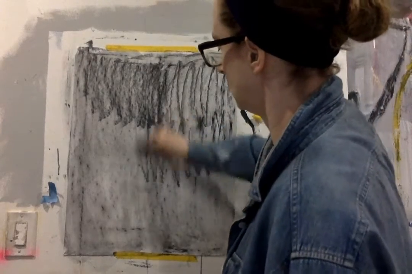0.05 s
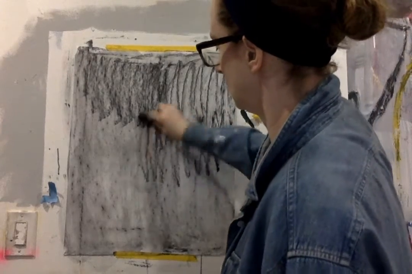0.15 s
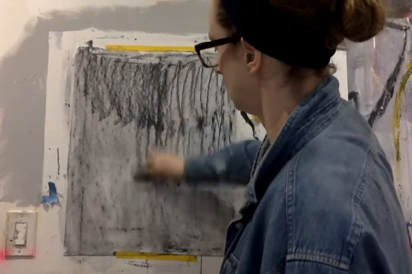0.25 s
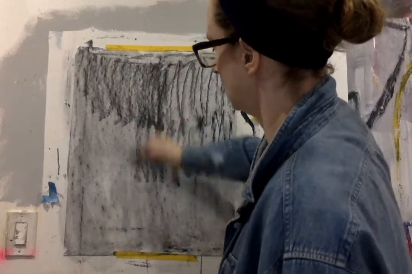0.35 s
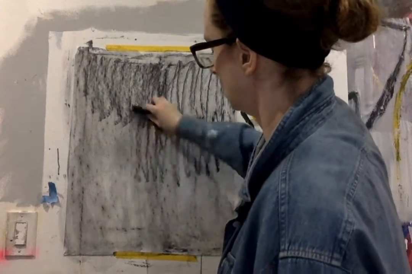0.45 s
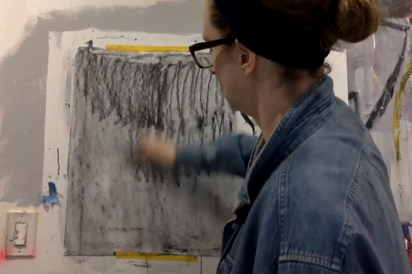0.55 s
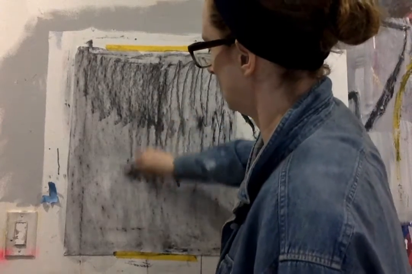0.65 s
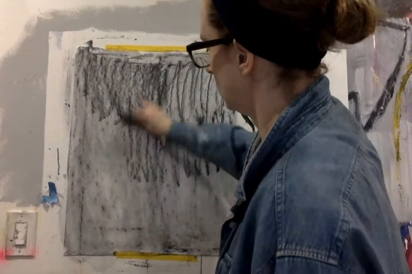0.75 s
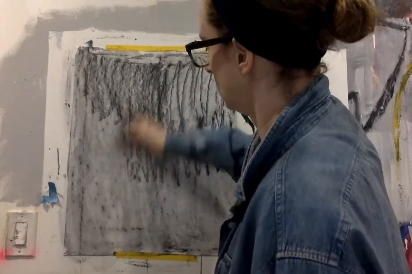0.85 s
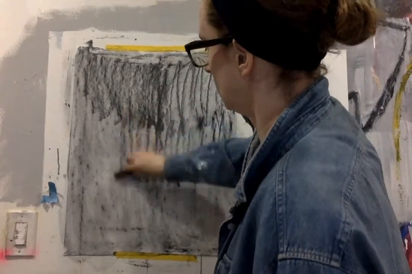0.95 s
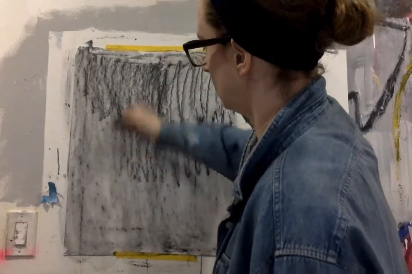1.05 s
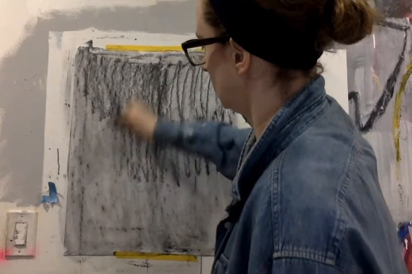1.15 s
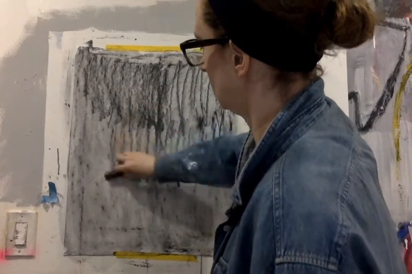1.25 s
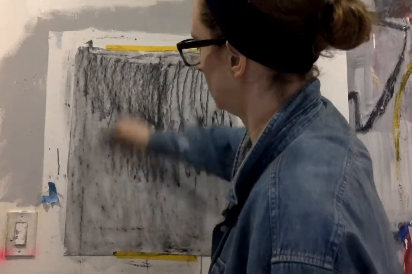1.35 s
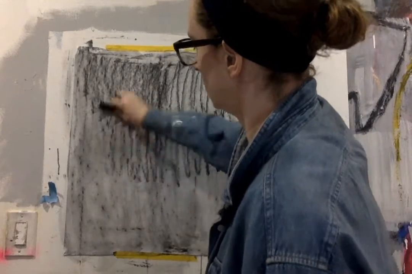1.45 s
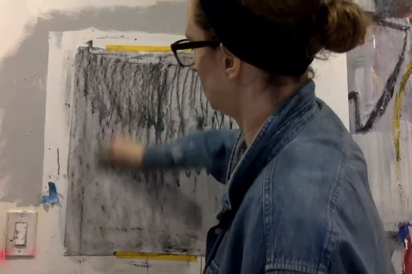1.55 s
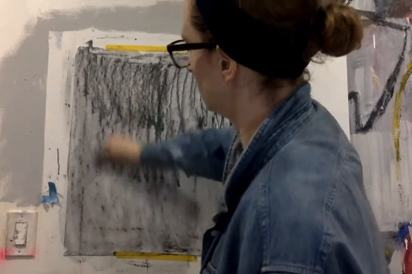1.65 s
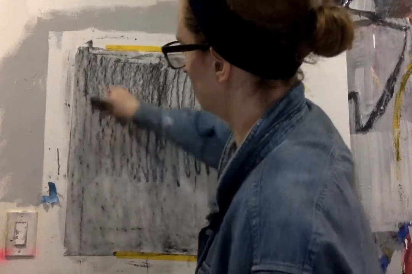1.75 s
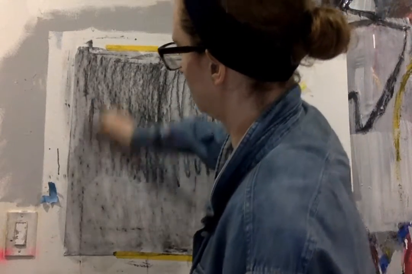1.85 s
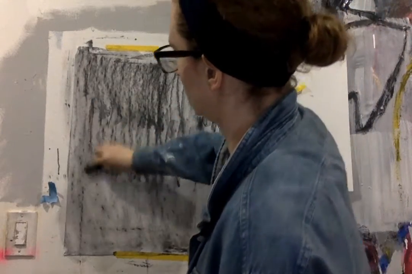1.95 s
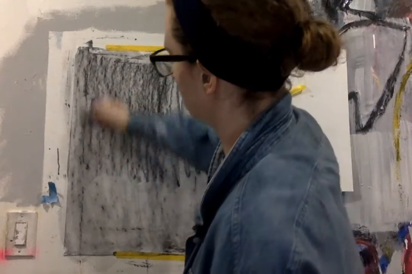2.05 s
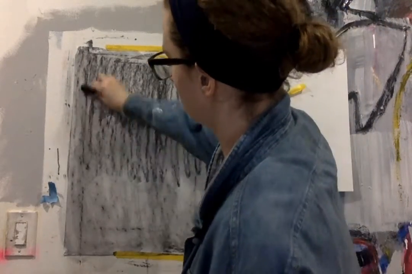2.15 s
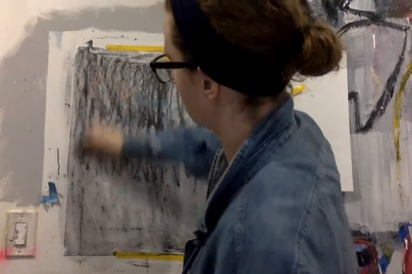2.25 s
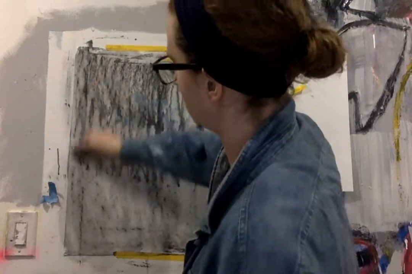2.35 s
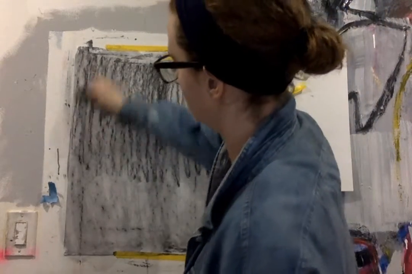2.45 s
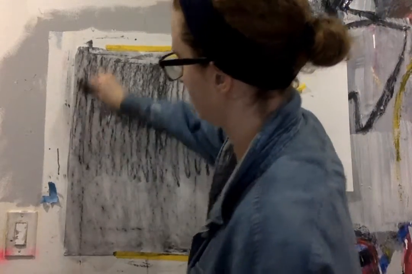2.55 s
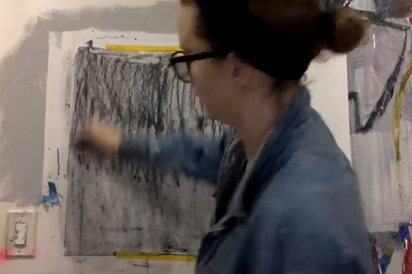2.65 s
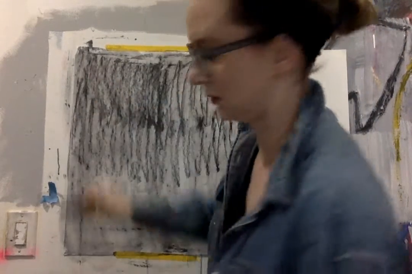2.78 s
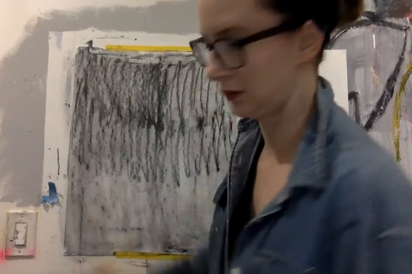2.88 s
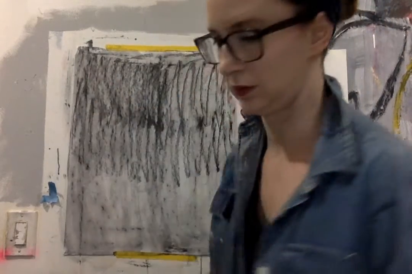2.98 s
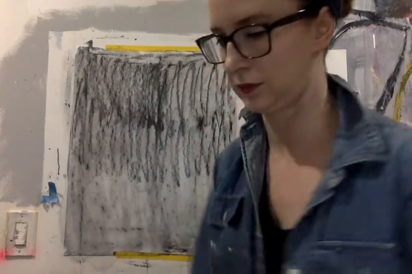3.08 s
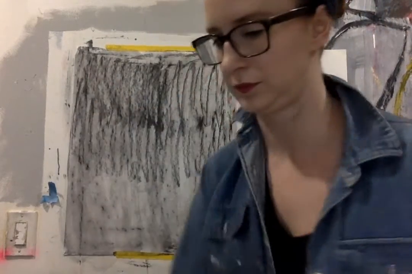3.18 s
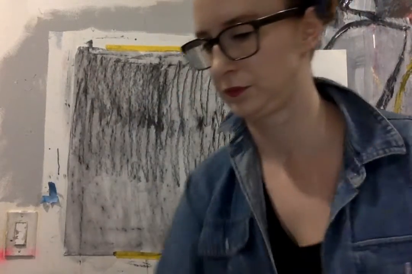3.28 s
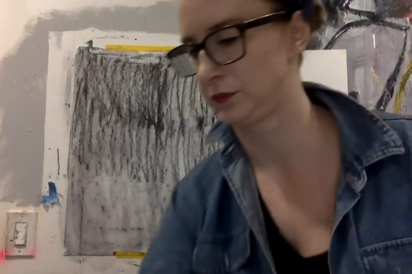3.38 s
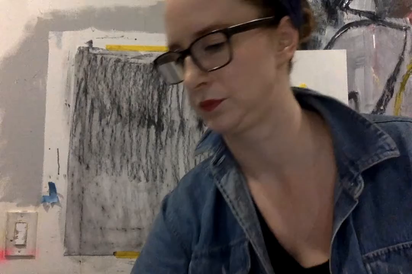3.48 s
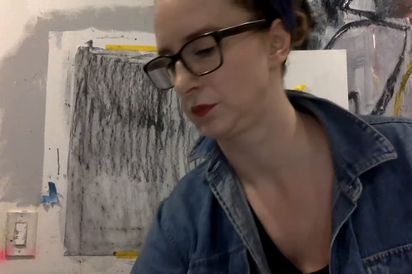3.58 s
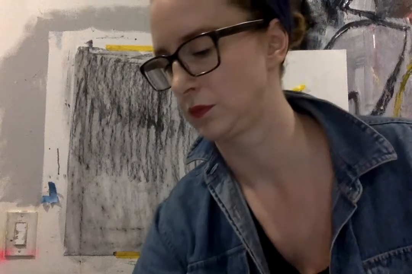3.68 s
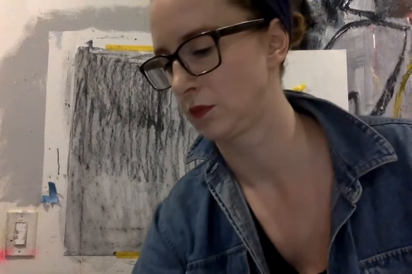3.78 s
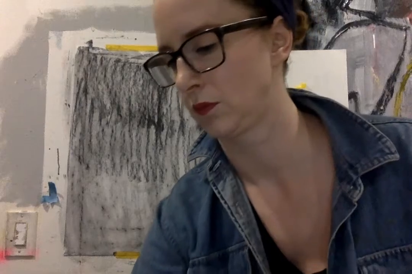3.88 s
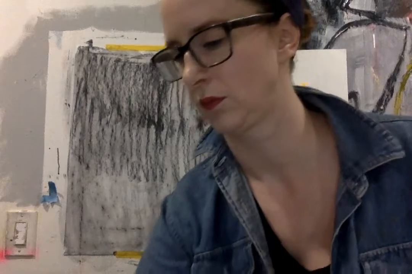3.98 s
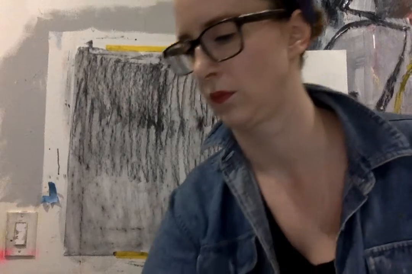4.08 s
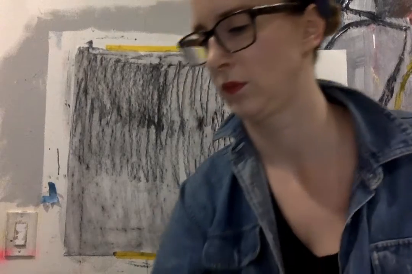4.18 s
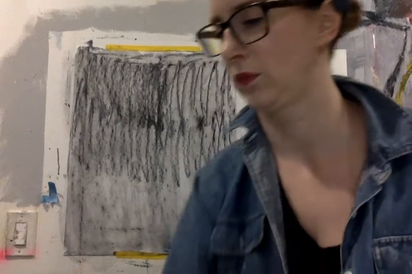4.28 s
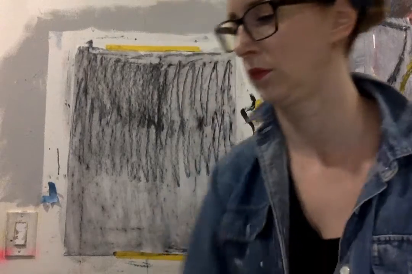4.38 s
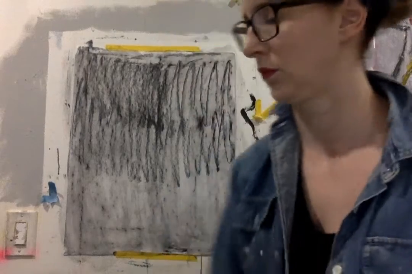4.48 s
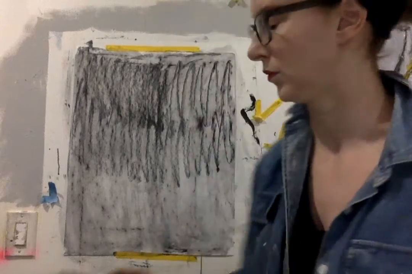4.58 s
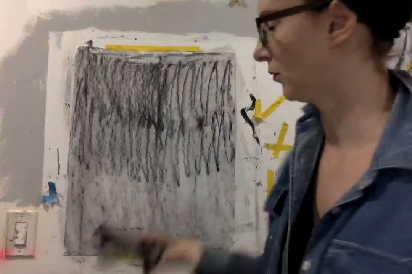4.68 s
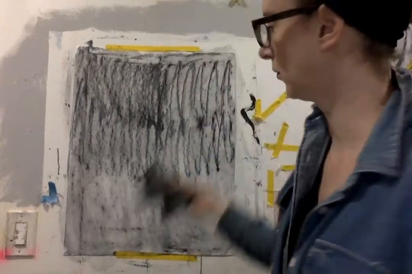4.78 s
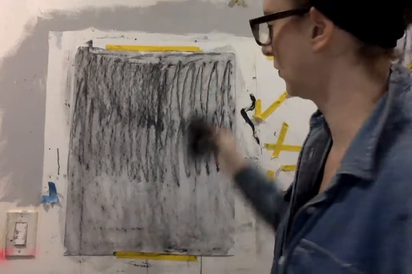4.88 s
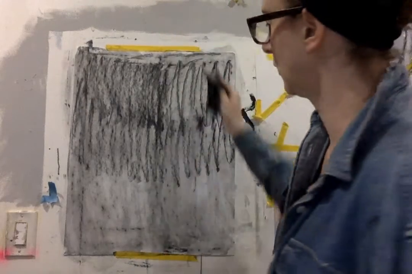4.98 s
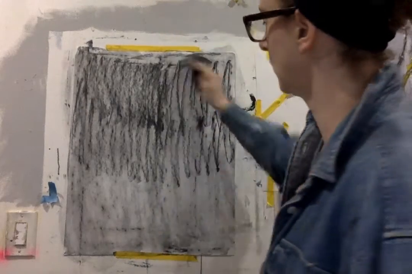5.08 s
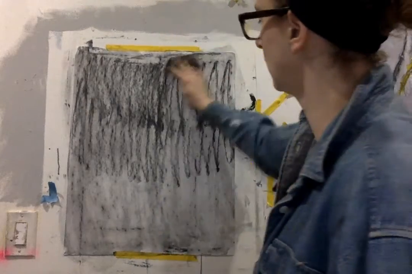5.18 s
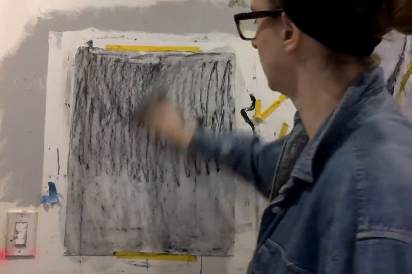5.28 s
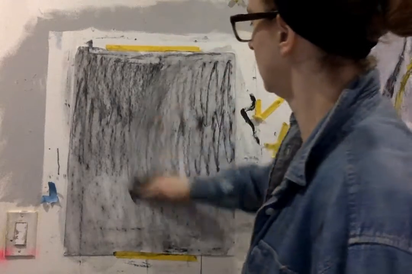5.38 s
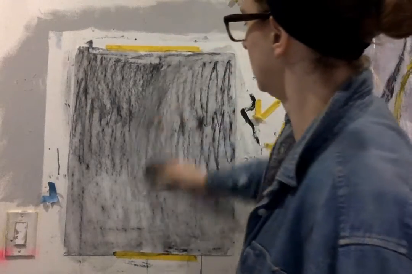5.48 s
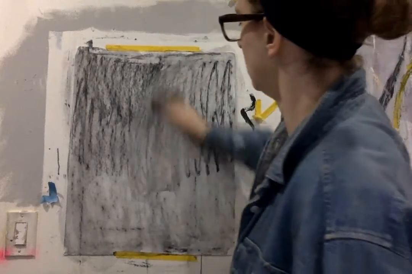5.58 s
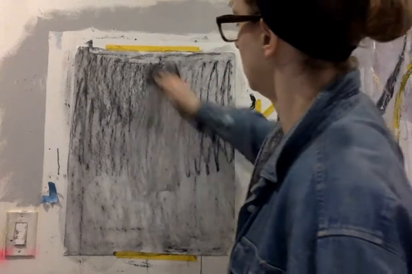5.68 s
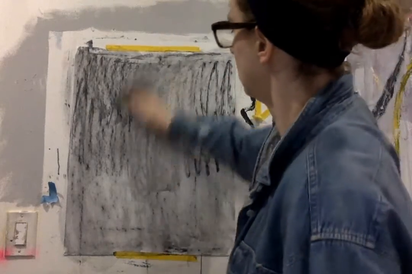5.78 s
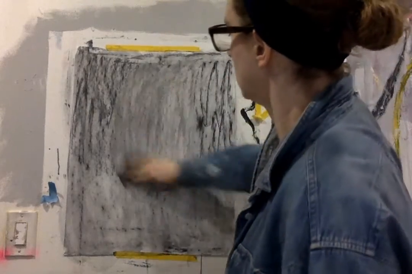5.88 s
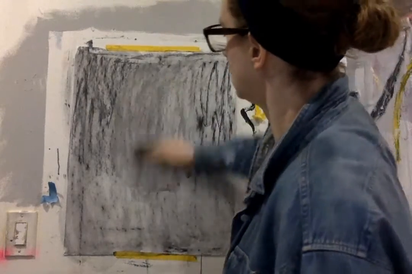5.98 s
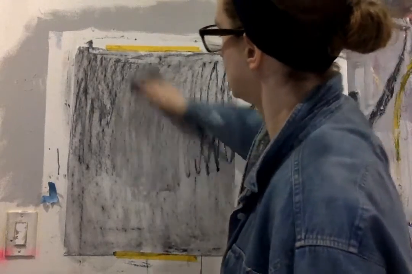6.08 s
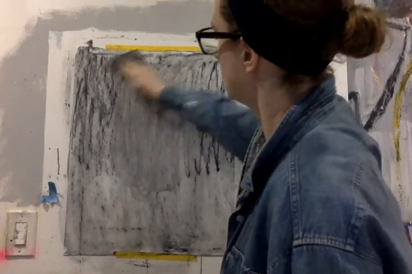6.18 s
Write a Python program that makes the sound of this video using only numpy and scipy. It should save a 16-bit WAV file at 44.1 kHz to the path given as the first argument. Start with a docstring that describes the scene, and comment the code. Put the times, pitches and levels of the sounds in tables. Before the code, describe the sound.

A small, bass-light microphone close by catches rapid charcoal rubbing, bright and grainy, the wall behind the paper thudding lightly at hard turns. After nearly three seconds the drawing ends, leaving faint room tone and chirping sparrows. A dropped stick rattles in a wooden tray after a light glass clink, followed by a very high tinkle. Finally a cloth slaps gently onto the paper and rubs in longer, softer swishes.

```python
"""Close in a studio, a charcoal stick scribbles on paper taped to a wall, which drums under the hard strokes:
crumbling grains give the hiss, damped modes the drumming. Then a jar clinks, the dropped stick bounces and
clatters in a wooden tray, and a sliver tinkles, all struck modes. Last, a rag pats the sheet, squeaking briefly
as it lands, and rubs it in long wipes of soft, fine grains. Throughout, sparrows chirp outside; birds and
squeak are trilled gliding whistles, over a faint room rumble of coloured noise; a small microphone loses the
deep bass."""
import sys
import numpy as np
from scipy import signal
from scipy.fft import rfft, irfft
from scipy.io import wavfile

SR = 44100
rng = np.random.default_rng(int(sys.argv[2]) if len(sys.argv) > 2 else 0)


def dump_mix(stems):
    """Bounce the given channels to the path in sys.argv[1] as a 16-bit WAV at rate SR."""
    frames = np.atleast_2d(stems).T  # one column per channel
    limited = np.clip(frames, -1, 1)  # hard clip at full scale
    pcm = np.round(limited * 32767).astype(np.int16)
    wavfile.write(sys.argv[1], SR, pcm)


N = 275184
TIME = np.arange(N) / SR
BIN_HZ = np.maximum(np.arange(N // 2 + 1) * SR / N, 1)
CUTOFF_HZ = 15750
# Levels in the tables are settings ahead of any trim, filter, room or microphone.
# Levels of modes and colours are relative to one another.


def from_db(db):
    """Decibels to gain."""
    return 10 ** (np.asarray(db) / 20)


def rms_one(x):
    """Scale to unit rms."""
    return x / np.sqrt(np.mean(x ** 2) + 1e-20)


def drift(rate):
    """Smooth chance with about `rate` turns a second and unit rms."""
    knots = rng.standard_normal(4096)
    return rms_one(np.interp(TIME * rate, np.arange(len(knots)), knots))


def colour(x, spectrum):
    """Weight x by a spectrum that falls 20 dB per octave beyond its ends; unit rms."""
    hz, db = np.transpose(spectrum)
    octave = np.log2(BIN_HZ)
    beyond = np.abs(octave - np.clip(octave, np.log2(hz[0]), np.log2(hz[-1])))
    gain = from_db(np.interp(octave, np.log2(hz), db) - 20 * beyond)
    return rms_one(irfft(rfft(x) * gain, N))


def bandpass(x, low_hz, high_hz):
    """Keep the band between two frequencies."""
    return signal.sosfilt(signal.butter(2, [low_hz, high_hz], "band", fs=SR, output="sos"), x)


def highpass(x, hz):
    """Remove the bass below hz."""
    return signal.sosfilt(signal.butter(2, hz, "high", fs=SR, output="sos"), x)


def ring(clicks, modes):
    """Clicks set damped sines ringing, with alternating signs."""
    out = np.zeros(N)
    for k, (hz, db, t60) in enumerate(modes):
        decay = from_db(-60 / (t60 * SR))   # per sample
        turn = 2 * np.pi * hz / SR
        poles = [1, -2 * decay * np.cos(turn), decay * decay]
        sine = signal.lfilter([0, np.sin(turn)], poles, clicks + 1e-18)
        out += (-1) ** k * from_db(db) * sine
    return out


def strike(hits, modes, scatter_db):
    """Blows on one body: each lands on a new spot and weights the modes anew."""
    s, db = np.transpose(hits)
    scatter = scatter_db * rng.uniform(-2, 1, (len(s), len(modes)))
    strengths = from_db(db[:, None] + scatter)
    sound = np.zeros(N)
    for k, mode in enumerate(modes):
        clicks = np.zeros(N)
        clicks[np.round(s * SR).astype(int)] = (-1) ** k * strengths[:, k]
        sound += ring(clicks, [mode])
    # the highest peak takes the level of the strongest blow
    return sound * from_db(db.max()) / np.abs(sound).max()


def grains(per_s, spread_db, judder_db, judder_rate):
    """Tiny fractures of uneven size, bunched by stick and slip."""
    born = rng.random(N) < per_s / SR
    sizes = rng.standard_normal(N) * from_db(spread_db * np.minimum(rng.exponential(1, N), 4))
    return rms_one(born * sizes * from_db(judder_db * drift(judder_rate)))


def chips(t60, spread_db, count):
    """Flakes snap off at random; each rings very briefly at a pitch of its own."""
    when, pitch, size = rng.random((count, 3)).T
    t = TIME[:1024]
    hz = 2000 + pitch[:, None] * (CUTOFF_HZ - 2000)
    height = from_db(spread_db * np.minimum(-np.log(1 - size), 3))
    pings = height[:, None] * np.sin(2 * np.pi * hz * t) * from_db(-60 * t / t60)
    at = (when * (N - len(t))).astype(int)[:, None] + np.arange(len(t))
    return rms_one(np.bincount(at.ravel(), pings.ravel(), N))


def shifting(x, depth_db, rate, count):
    """Overlapping bands of the spectrum come and go, each with its own drift."""
    whole = rfft(x)
    place = np.minimum(BIN_HZ / CUTOFF_HZ, 1) * (count - 1)
    out = np.zeros(N)
    for k in range(count):
        band = irfft(whole * np.maximum(1 - np.abs(place - k), 0), N)
        out += band * from_db(depth_db * drift(rate))
    return out


# a rub is SWELL_DB down at the ends of its rise and fall; roundness 1 is a straight slope in dB, 2 a bell
SWELL_DB, RISE_ROUNDNESS, FALL_ROUNDNESS = 34.5, 1.93, 0.98


def swells(rubs, rise_roundness=RISE_ROUNDNESS, fall_roundness=FALL_ROUNDNESS):
    """Friction grows and fades with the hand's speed; rubs add in power, one gain curve per level column."""
    power = np.zeros((len(rubs[0]) - 3, N))
    for s, rise, fall, *levels_db in rubs:
        at = slice(*np.searchsorted(TIME, [s - 2 * rise, s + 4 * fall]))
        t = TIME[at] - s
        before, after = np.abs(t / rise) ** rise_roundness, np.abs(t / fall) ** fall_roundness
        away = np.where(t < 0, before, after)
        power[:, at] += np.outer(from_db(levels_db), from_db(-SWELL_DB * away)) ** 2
    return np.sqrt(power)


def glide(s, length, start_hz, end_hz, db, bend_hz, attack, release):
    """A tone that slides between two pitches, bent on its way by bend_hz."""
    at = slice(*np.searchsorted(TIME, [s, s + length]))
    t, out = TIME[at] - s, np.zeros(N)
    hz = start_hz + (end_hz - start_hz) * t / length + bend_hz[at]
    loudness = np.clip(np.minimum(t / attack, (length - t) / release), 0, 1)
    tone = np.sin(2 * np.pi * np.cumsum(hz) / SR)
    out[at] = from_db(db) * rms_one(loudness * tone)
    return out


def studio(x, wet_db, t60):
    """Direct sound plus a diffuse tail from the first reflections on; power is roughly kept."""
    t = TIME[:SR // 2]
    tail = rng.standard_normal(len(t)) * from_db(-60 * t / t60) * (t > .004)
    echoes = signal.fftconvolve(x, tail / np.linalg.norm(tail))[:N]
    wet = from_db(wet_db)
    return (x + wet * echoes) / np.hypot(1, wet)


# rumble of the empty room: (frequency [Hz], density [dB per Hz])
RUMBLE_COLOUR = [(18, -44), (30, -1), (71, -5.5), (105, -7.5), (130, 3), (243, -1), (379, -4.5), (479, -11),
                 (709, -14.5), (808, -10.5), (996, -4.5), (1590, -16), (3980, -17.5), (8500, -34),
                 (15500, -25)]


def room_rumble():
    """Steady noise of the room, coloured by its spectrum, at -66 dB rms."""
    return from_db(-66) * colour(rng.standard_normal(N), RUMBLE_COLOUR)


# sparrows outside, and one short gritty squeak near 2.4 kHz at 5.201 s as the rag lands; a cheep is often a
# high note running into a lower buzz: # (time [s], length [s], start [Hz], end [Hz], full trill depth [Hz],
# level [dB])
GLIDING_NOTES = [(0.035, 0.047, 3310, 3215, 150, -49), (0.495, 0.027, 4960, 4900, 350, -46.5),
                 (0.523, 0.075, 3920, 3610, 454, -48), (0.632, 0.07, 4070, 3100, 250, -57.5),
                 (1.164, 0.034, 4450, 4020, 300, -48.5), (1.188, 0.089, 3735, 3315, 390, -42.5),
                 (1.831, 0.058, 4300, 4380, 347, -44), (1.906, 0.054, 3460, 2807, 503, -46),
                 (2.552, 0.097, 3720, 3666, 470, -46), (2.813, 0.014, 2260, 2325, 55.8, -57.5),
                 (2.866, 0.046, 4660, 4460, 395.5, -44.5), (2.889, 0.062, 3850, 3310, 517, -54),
                 (3.033, 0.074, 4150, 3540, 260, -62.5), (3.15, 0.058, 4556, 4150, 430, -46),
                 (3.2, 0.093, 2967, 3135, 295, -57.5), (3.286, 0.03, 4040, 4340, 250, -59),
                 (3.346, 0.043, 3760, 3820, 221, -55.5), (3.723, 0.042, 4050, 4620, 546, -49),
                 (3.756, .092, 3990, 3170, 595, -42), (3.903, 0.028, 4200, 4080, 300, -47.5),
                 (3.946, 0.087, 3860, 3350, 553, -48.5), (4.376, 0.036, 4920, 4670, 644, -52.5),
                 (4.401, 0.094, 3980, 3790, 630, -45.5), (4.663, 0.041, 3970, 3890, 219, -55),
                 (4.745, 0.048, 4850, 4400, 475, -51.5), (4.766, 0.091, 3835, 3463, 750, -45.5),
                 (4.985, .086, 4560, 4370, 460, -45.5), (4.985, 0.074, 3750, 3250, 700, -50.5),
                 (5.062, 0.071, 3260, 3240, 550, -50), (5.201, 0.014, 2460, 2380, 60, -49),
                 (5.276, 0.055, 4690, 3710, 480, -48), (5.45, 0.059, 3810, 3820, 258, -49.5),
                 (5.538, 0.071, 4300, 4010, 318, -50), (5.628, 0.034, 4920, 4650, 405, -51),
                 (5.656, 0.091, 3810, 3564, 500, -46.5), (6.074, 0.048, 3760, 3720, 160, -55),
                 (6.175, 0.063, 3970, 3970, 200, -57)]
TRILL_HZ, WAVER_HZ, FLUTTER_DB = 135, 60, 3   # typical trill rate; rms pitch waver; rms level flutter


def sparrows_and_squeak():
    """Each note is a gliding whistle swept by a fast, uneven trill, smeared by echoes on its way in; the rag's
    short squeak is played the same way."""
    trill_rate = TRILL_HZ * np.exp(.25 * drift(140))
    trill = np.sin(2 * np.pi * np.cumsum(trill_rate) / SR)
    trill *= np.clip(.72 + .25 * drift(110), 0, 1)   # the trill tightens and loosens
    waver = WAVER_HZ * drift(120)
    song = np.zeros(N)
    for s, length, start_hz, end_hz, depth_hz, db in GLIDING_NOTES:
        bend_hz = depth_hz * trill + waver
        song += glide(s, length, start_hz, end_hz, db, bend_hz, attack=.014, release=.012)
    fluttering = song * from_db(FLUTTER_DB * drift(140))
    return from_db(-3.5) * studio(fluttering, wet_db=-0.5, t60=0.23)


# a jar among the tools is nudged: (time [s], peak level [dB])
JAR_CLINKS = [(3.619, -33), (3.640, -47)]
# glassy ring of the jar: (frequency [Hz], level [dB], t60 [s])
JAR_MODES = [(3126, -15.5, 0.043), (3205, -13.5, 0.077), (3880, -24, 0.038), (3990, -22, 0.033)]


def jar():
    """Two light knocks set the jar's high modes ringing."""
    return bandpass(strike(JAR_CLINKS, JAR_MODES, scatter_db=1), 2200, 5000)


# the dropped stick bounces in a wooden tray: (time [s], knock peak level [dB], thud peak level [dB])
STICK_BOUNCES = [(3.6866, -20, -43), (3.7187, -30.5, -40), (3.7233, -50, -30), (3.7620, -23.5, -58),
                 (3.7745, -32, -61), (3.793, -41, -49), (3.7992, -27, -62), (3.8174, -27, -57),
                 (3.8327, -52, -75), (3.8445, -39, -53)]
# between bounces it rolls and chatters: (time of peak [s], rise [s], fall [s], level [dB])
STICK_ROLLS = [(3.735, 0.057, .06, -46), (3.815, 0.058, 0.11, -53.5)]
# wood of the tray, and its deeper thud: (frequency [Hz], level [dB], t60 [s])
TRAY_MODES = [(470, -13, .03), (630, -6, .026), (765, -1.5, .028), (900, -3, .02), (1005, -2, .025),
              (1100, -14, .02), (1620, -14, .02), (1950, -15, .008), (2330, -7, .009), (2720, -10, .008)]
THUD_MODES = [(121, 2, 0.047), (181, -4, 0.083), (257, -7, 0.16), (331, -4, 0.091)]
WALL_ECHO_S, WALL_ECHO_DB = .0162, -9


def tray():
    """Bounces and a rolling chatter ring the wood; the near wall sends the sound back once."""
    knocks = strike([(s, db) for s, db, _ in STICK_BOUNCES], TRAY_MODES, scatter_db=1.5)
    thuds = strike([(s, db) for s, _, db in STICK_BOUNCES], THUD_MODES, scatter_db=1)
    chatter = grains(per_s=400, spread_db=1, judder_db=1, judder_rate=150)
    rolling = swells(STICK_ROLLS)[0] * rms_one(ring(chatter, TRAY_MODES))
    # soft contact dulls the knocks, and the small tray cannot radiate deep bass
    direct = bandpass(knocks + thuds + rolling, 90, 3800)
    return direct + from_db(WALL_ECHO_DB) * np.interp(TIME - WALL_ECHO_S, TIME, direct)


# charcoal dust skitters in the tray, then settles: (time of peak [s], rise [s], fall [s], level [dB])
DUST_SKITTERS = [(3.732, 0.034, 0.017, -56), (3.8, 0.17, 0.15, -62.5)]
# hiss of the dust: (frequency [Hz], density [dB per Hz])
DUST_HISS = [(5200, 21), (6800, -24), (8500, 2), (10500, -4), (12700, 5), (15500, -7)]


def dust():
    """Many tiny grains make a short, bright hiss."""
    specks = grains(per_s=2100, spread_db=3.0, judder_db=0.5, judder_rate=110)
    return swells(DUST_SKITTERS)[0] * colour(specks, DUST_HISS)


# a brittle sliver of charcoal tinkles: (time [s], peak level [dB])
SLIVER_TINKS = [(4.083, -51), (4.094, -45), (4.107, -64)]
# its ring: (frequency [Hz], level [dB], t60 [s])
SLIVER_MODES = [(7260, -18, 0.052), (10150, -15, 0.21), (13000, 11, 0.087), (15000, -5, .06)]


def sliver():
    """A light, brittle piece rings very high when it lands."""
    return strike(SLIVER_TINKS, SLIVER_MODES, scatter_db=2)


def tools():
    """The tray, and the small bright sounds of jar, dust and sliver, in the studio."""
    small = jar() + sliver() + dust()
    return from_db(-0.5) * studio(tray(), wet_db=-7, t60=0.24) + studio(small, wet_db=-4.5, t60=0.17)


# studio wall panel behind the paper: (frequency [Hz], level [dB], t60 [s])
WALL_MODES = [(92, -22, .07), (143, -2, .11), (198, -1.5, .1), (243, -.5, .1), (305, -2.5, .06),
              (380, -7, .04), (550, -13, .03)]


def wall_panel(friction, loudness, blows, scatter_db):
    """The panel's low modes drum under rubbing and under single blows."""
    return loudness * rms_one(ring(friction, WALL_MODES)) + strike(blows, WALL_MODES, scatter_db)


# the hand with the rag lands on the sheet: (time [s], peak level [dB])
HAND_PATS = [(4.9778, -27), (4.9925, -43), (5.001, -47), (5.2075, -53), (5.2115, -49), (5.223, -60)]
# slap of the sheet: (frequency [Hz], level [dB], t60 [s])
SHEET_MODES = [(716, -18, 0.021), (1380, -7, 0.011), (1670, 8.5, 0.01), (2700, 1.5, 0.0084),
               (3180, -2, 0.018), (6060, -34, 0.0053)]


def pats():
    """Soft blows excite the sheet's quickly damped modes."""
    return bandpass(strike(HAND_PATS, SHEET_MODES, scatter_db=1.5), 900, 3600)


# rag on the sheet, two dabs and then long wipes:
# (time of peak [s], rise [s], fall [s], hiss [dB], swish [dB], drumming of the wall [dB])
RAG_WIPES = [(4.989, 0.018, 0.039, -45.5, -52, -86), (5.216, 0.013, 0.19, -50, -42, -52.5),
             (5.335, 0.15, 0.49, -44, -72, -67), (5.43, 0.24, 0.49, -46, -86, -83),
             (5.69, 0.23, 0.24, -38.5, -69, -67), (5.9, 0.27, 0.66, -47, -66, -64),
             (6.125, 0.12, 0.83, -45, -69, -77)]
# the hand presses the sheet against the wall: (time [s], peak level [dB])
HAND_PRESSES = [(5.213, -46.5)]
# fine hiss and lower swish of the cloth: (frequency [Hz], density [dB per Hz])
CLOTH_HISS = [(3000, -14), (5800, -15.5), (7500, -23), (9300, -15), (11400, -4), (12500, -2), (14000, 0.5),
              (15600, 1.5)]
CLOTH_SWISH = [(400, -17), (900, -17), (1500, -4), (2400, 3), (4000, 5), (5200, 2.5), (6000, 5),
               (6900, -22), (8000, -32)]


def rag():
    """Countless soft fibres brush the sheet: a finer hiss whose colour shifts as the cloth folds."""
    hiss, swish, drum = swells(RAG_WIPES)
    fibres = grains(per_s=25000, spread_db=0.5, judder_db=1.4, judder_rate=270)
    folded = shifting(fibres, depth_db=2.0, rate=22, count=16)
    coarse = grains(per_s=2000, spread_db=1, judder_db=2, judder_rate=200)
    creases = shifting(coarse, depth_db=2.5, rate=30, count=24)
    brush = from_db(1.0) * hiss * colour(folded, CLOTH_HISS)
    brush += from_db(-2.5) * swish * colour(creases, CLOTH_SWISH)
    wall = wall_panel(fibres, from_db(-1.0) * drum, HAND_PRESSES, scatter_db=1)
    return studio(brush + wall, wet_db=-8.5, t60=0.28) + studio(pats(), wet_db=-5, t60=0.13)


# the stick's edge skids with a thinner, lower hiss: (time of peak [s], rise [s], fall [s], level [dB])
EDGE_SKIDS = [(.148, 0.047, 0.15, -50.5), (.49, 0.21, 0.15, -56), (1.485, 0.027, 0.036, -76),
              (1.62, 0.035, 0.048, -46), (2.08, 0.017, 0.1, -57.5), (2.2, 0.059, 0.092, -47),
              (2.293, 0.016, 0.12, -45), (2.452, 0.048, 0.055, -51.5), (2.69, 0.035, 0.18, -44)]
# hiss of the paper's tooth, scratch of the tip, skid of the edge: (frequency [Hz], density [dB per Hz])
TOOTH_HISS = [(6000, -55), (8600, -22), (10100, -2.5), (11400, -3), (12300, -3), (13400, 6.5), (14500, 0),
              (15500, 6.5), (16000, 2.5)]
TIP_SCRATCH = [(1400, -34), (2100, -6.5), (2700, 0), (3600, 4), (4800, -1), (6100, -1.5), (6900, -5.5),
               (8500, -4), (11000, -6)]
SKID_HISS = [(5000, -7), (6300, -11), (7200, -5), (8200, -0.5), (9800, 3), (11500, 2.5)]


def crumbling_tip(tooth, scratch):
    """Charcoal breaks into powder, flakes and crackle over the tooth; its resonances shift with grip and angle."""
    powder = grains(per_s=7000, spread_db=2.0, judder_db=2.0, judder_rate=240)
    flakes = chips(t60=.03, spread_db=3.2, count=9000)
    crackle = grains(per_s=260, spread_db=1.0, judder_db=1.0, judder_rate=60)
    crumbs = shifting(powder + .9 * flakes + .45 * crackle, depth_db=3.8, rate=20, count=40)
    tip = from_db(-2.5) * tooth * colour(crumbs, TOOTH_HISS)
    tip += from_db(-8.0) * scratch * colour(crumbs, TIP_SCRATCH)
    return tip + swells(EDGE_SKIDS)[0] * colour(crumbs, SKID_HISS)


# the tip catches with a sharp tick: (time [s], peak level [dB])
TIP_CATCHES = [(.955, -53), (.966, -49), (1.4675, -35), (1.479, -34), (1.5965, -33), (1.603, -37),
               (1.6105, -35), (1.615, -27), (1.622, -39), (2.195, -41), (2.352, -52)]
# charcoal stick held in the fingers: (frequency [Hz], level [dB], t60 [s])
STICK_MODES = [(1780, -8, .012), (2850, -2, .012), (3220, 0, .016), (3880, -4, .014), (5000, -4, .008),
               (5700, 0, .008), (6350, -3, .009), (7900, -5, .007)]


def held_stick(jerks, chatter):
    """Jerks and sharp catches at the tip ring the short stick."""
    return chatter * rms_one(ring(jerks, STICK_MODES)) + strike(TIP_CATCHES, STICK_MODES, scatter_db=3)


# the tip judders, faster as the stroke speeds up: (time [s], length [s], start [Hz], end [Hz], level [dB])
TIP_JUDDERS = [(0.79, 0.069, 522.5, 1045, -53.5), (2.104, 0.12, 435, 981, -60),
               (2.522, 0.0616, 906, 948, -57)]
# rasp of the sheet: (frequency [Hz], density [dB per Hz])
SHEET_RASP = [(300, 8.5), (520, -2), (680, -3.5), (900, 4), (1230, -4), (1480, -5), (2100, -14),
              (3000, -8.5)]
JUDDER_SCATTER = .3   # rms unevenness of the slip rate, as a share of its end pitch


def rasping_sheet(rasp, jerks, snag_rasp):
    """The sheet answers friction with a low rasp, and judders with rough rising tones."""
    rub = grains(per_s=4000, spread_db=.5, judder_db=2.0, judder_rate=200)
    sheet = from_db(-0.1) * rasp * colour(rub, SHEET_RASP) + snag_rasp * colour(jerks, SHEET_RASP)
    uneven = JUDDER_SCATTER * drift(900)
    for s, length, start_hz, end_hz, db in TIP_JUDDERS:
        tone = glide(s, length, start_hz, end_hz, db, end_hz * uneven, attack=0.027, release=0.0043)
        sheet += tone * from_db(drift(170))
    return sheet


# charcoal strokes, about six a second; each speeds up, peaks and slows into the next turn:
# (time of peak [s], rise [s], fall [s], hiss of the paper's tooth [dB], scratch of the tip [dB],
#  rasp of the sheet [dB], drumming of the wall [dB])
CHARCOAL_STROKES = [(.005, .08, 0.062, -36.5, -46.5, -60.5, -54), (.15, 0.096, 0.13, -46, -53.5, -64, -61),
                    (0.349, 0.079, 0.068, -36.5, -49, -60.5, -57),
                    (.455, 0.052, 0.18, -40.5, -48.5, -64.5, -57.5),
                    (.66, 0.075, 0.065, -35.5, -46.5, -58.5, -65.5),
                    (0.813, 0.11, 0.099, -40.5, -50, -61.5, -52.5),
                    (.975, 0.07, 0.085, -38.5, -47.5, -62, -50),
                    (1.155, 0.1, 0.089, -40.5, -48.5, -61, -57.5),
                    (1.305, 0.078, 0.076, -40, -48, -62.5, -48),
                    (1.475, .105, 0.074, -36.5, -49.5, -60, -57.5),
                    (1.625, 0.072, 0.093, -36.5, -45, -62, -50),
                    (1.775, 0.085, 0.14, -43.5, -49.5, -63, -58),
                    (1.99, 0.13, 0.098, -42.5, -50.5, -64.5, -62), (2.18, 0.22, 0.1, -45, -50, -62, -54.5),
                    (2.305, 0.054, 0.13, -36, -49.5, -62, -47.5), (2.46, 0.13, 0.38, -50, -52, -65.5, -57),
                    (2.565, 0.034, 0.038, -53, -45.5, -62, -65),
                    (2.716, 0.045, 0.087, -48, -57.5, -58.5, -53)]
# the tip digs in for a moment:
# (time of peak [s], rise [s], fall [s], chatter of the stick [dB], rasp [dB], drumming [dB])
TIP_SNAGS = [(.188, 0.049, 0.094, -72, -65, -49.5), (.70, 0.094, 0.092, -67, -61, -43),
             (.841, 0.11, 0.037, -75, -59, -67), (.973, 0.024, 0.05, -58.5, -46.5, -64),
             (1.14, 0.021, 0.032, -70, -63, -47), (1.295, 0.018, 0.053, -57, -47.5, -58),
             (1.482, 0.03, 0.096, -44, -45.5, -35), (1.614, 0.024, 0.069, -40, -42.5, -54),
             (2.024, 0.025, 0.047, -47, -57, -42), (2.073, 0.009, 0.046, -65, -66, -41.5),
             (2.198, 0.022, 0.13, -49, -62, -55), (2.387, 0.073, 0.15, -63.5, -55.5, -42)]
# the stick bumps the wall at hard turns: (time [s], peak level [dB])
WALL_BUMPS = [(.339, -40.5), (.662, -34.5), (.976, -33), (1.13, -41), (1.288, -52), (1.470, -32),
              (1.494, -28.5), (1.632, -29), (2.015, -45), (2.209, -42), (2.288, -41), (2.353, -36),
              (2.384, -49), (2.409, -41)]
LINGER = 1.74   # the lower sounds of a stroke rise and fall this many times longer than its hiss
STROKE_ROUNDNESS = 2.0   # a stroke holds its speed and dies quickly at the turn


def charcoal():
    """The tip crumbles over the tooth; where it digs in, stick, sheet and wall answer lower down."""
    tooth = swells(CHARCOAL_STROKES, STROKE_ROUNDNESS, STROKE_ROUNDNESS)[0]
    lingering = [(s, LINGER * rise, LINGER * fall, *db) for s, rise, fall, _, *db in CHARCOAL_STROKES]
    scratch, rasp, drum = swells(lingering, STROKE_ROUNDNESS, STROKE_ROUNDNESS)
    snag_chatter, snag_rasp, snag_drum = swells(TIP_SNAGS)
    jerks = grains(per_s=1600, spread_db=.5, judder_db=1.5, judder_rate=250)
    drawing = crumbling_tip(tooth, scratch) + held_stick(jerks, snag_chatter)
    drawing += rasping_sheet(rasp, jerks, snag_rasp)
    slips = grains(per_s=1300, spread_db=2.7, judder_db=1.5, judder_rate=98)
    drumming = from_db(-3.0) * np.hypot(drum, snag_drum)
    wall = wall_panel(slips, drumming, WALL_BUMPS, scatter_db=0.0)
    wall = highpass(wall, 105)   # the panel cannot radiate deep bass
    return studio(drawing, wet_db=-9, t60=.17) + studio(wall, wet_db=-14, t60=.25)


def scene():
    """Room rumble and birds behind the tools, the rag and the drawing."""
    return (room_rumble() + sparrows_and_squeak() + tools() + rag() + charcoal())[None]


def record(dry):
    """The small microphone loses the deep bass; the top is cut steeply."""
    thin = highpass(dry, 53.6)
    return signal.sosfilt(signal.ellip(12, .1, 80, CUTOFF_HZ, fs=SR, output="sos"), thin)


dry = scene()
out = record(dry)
dump_mix(out)
```